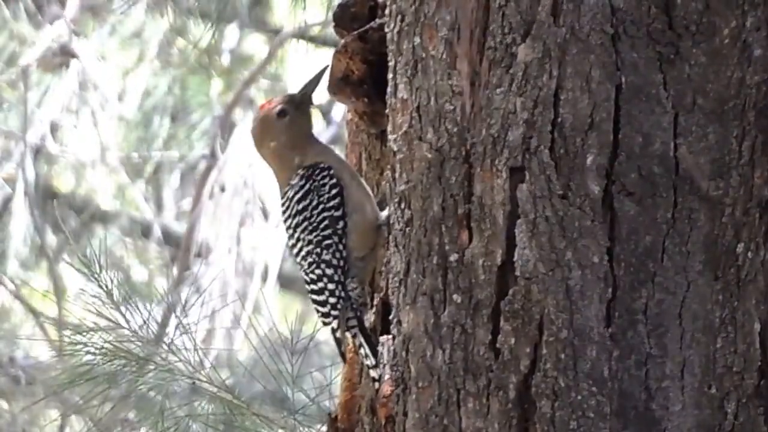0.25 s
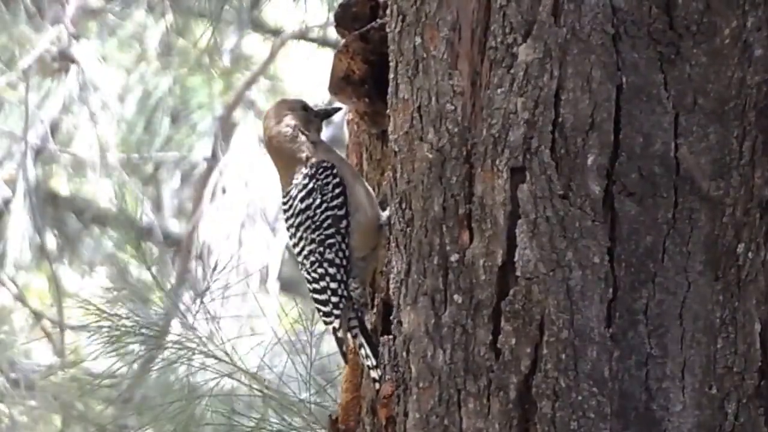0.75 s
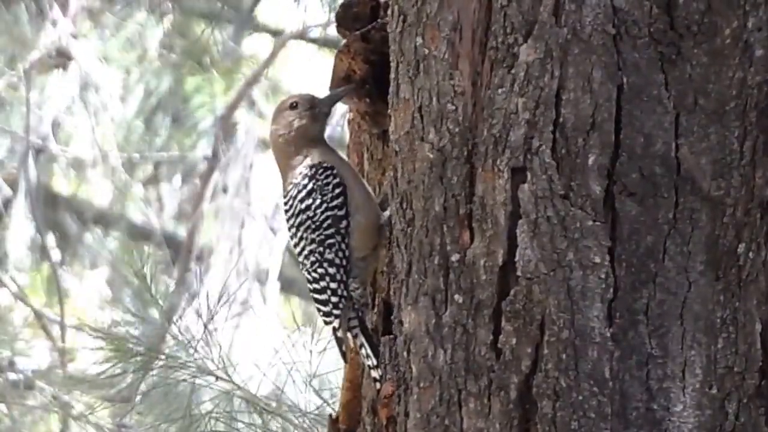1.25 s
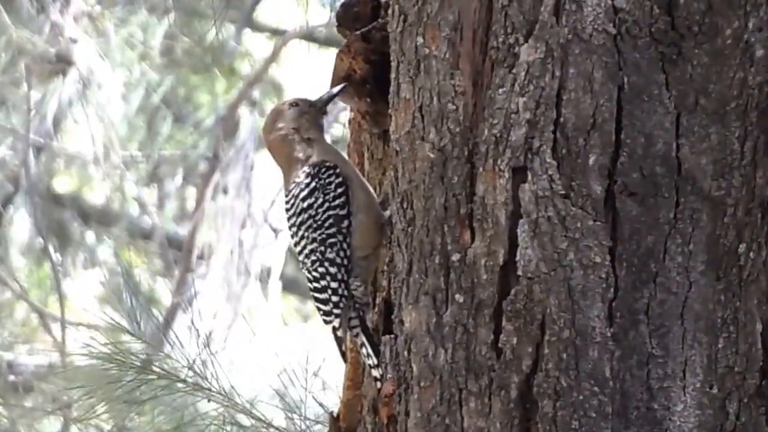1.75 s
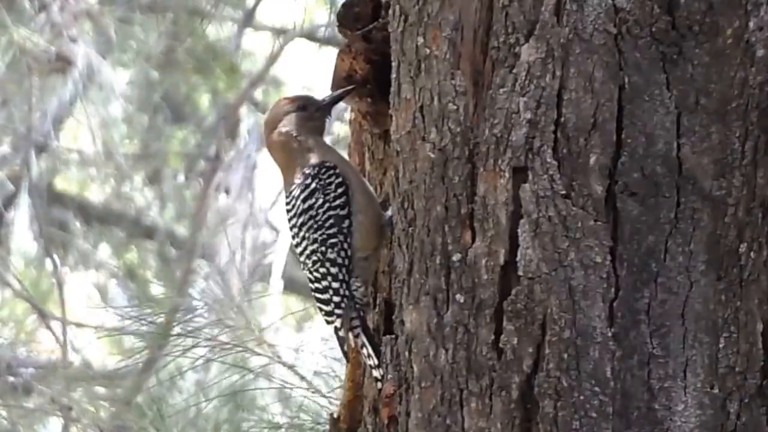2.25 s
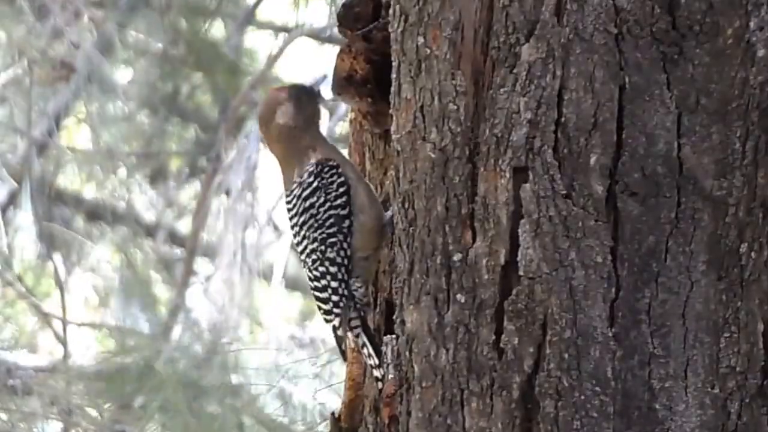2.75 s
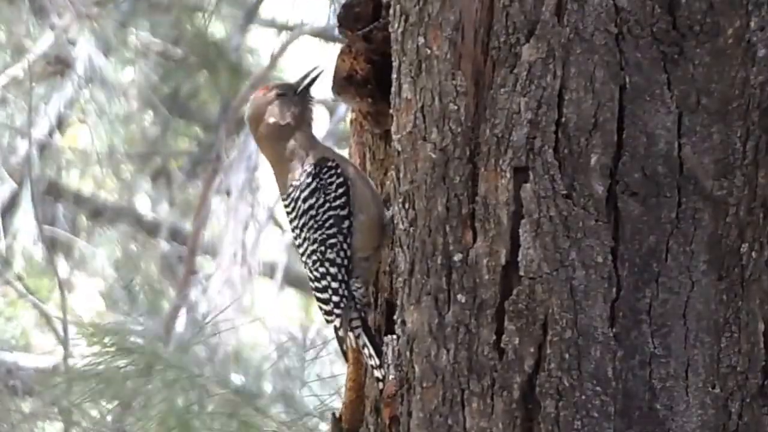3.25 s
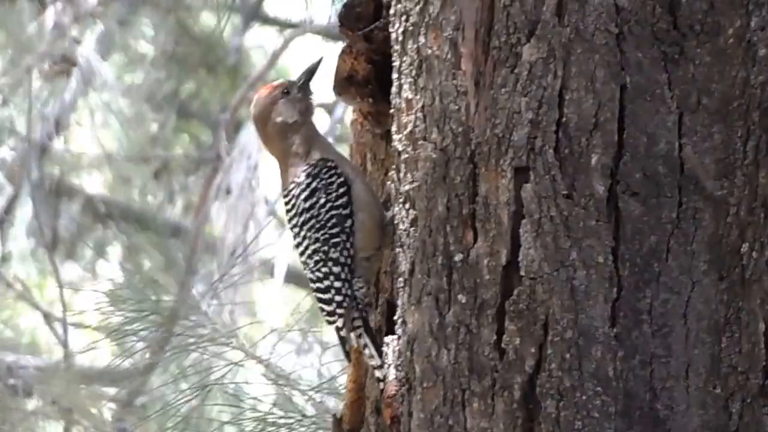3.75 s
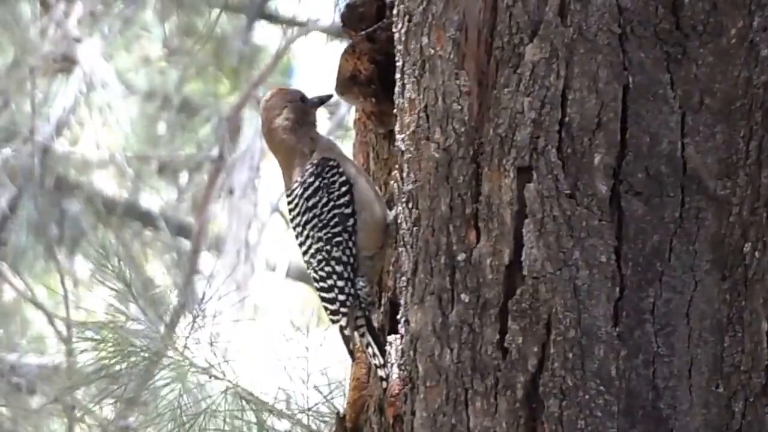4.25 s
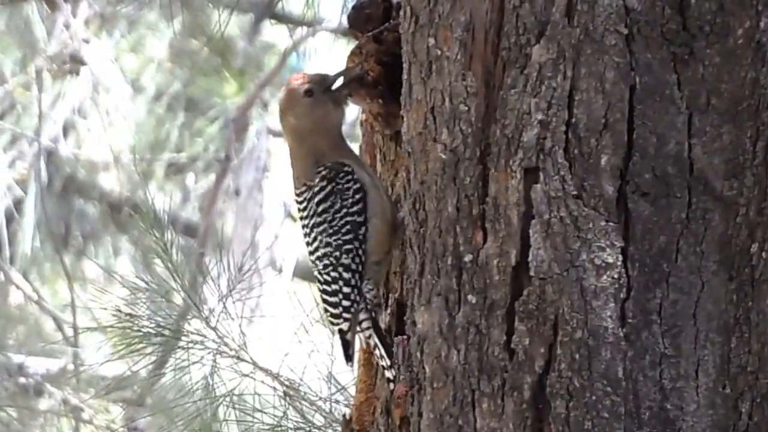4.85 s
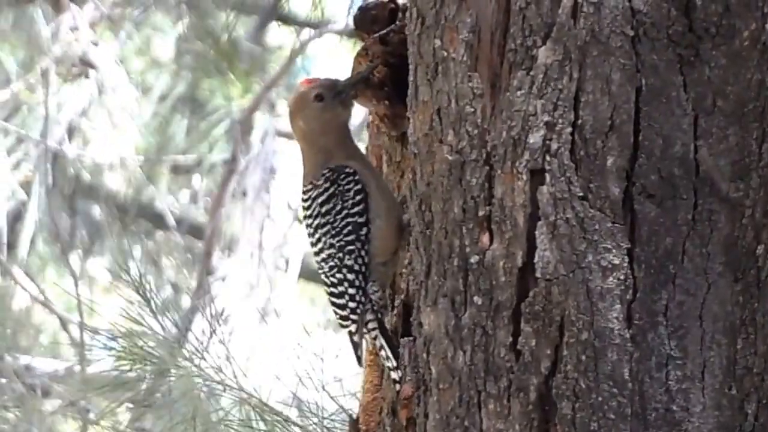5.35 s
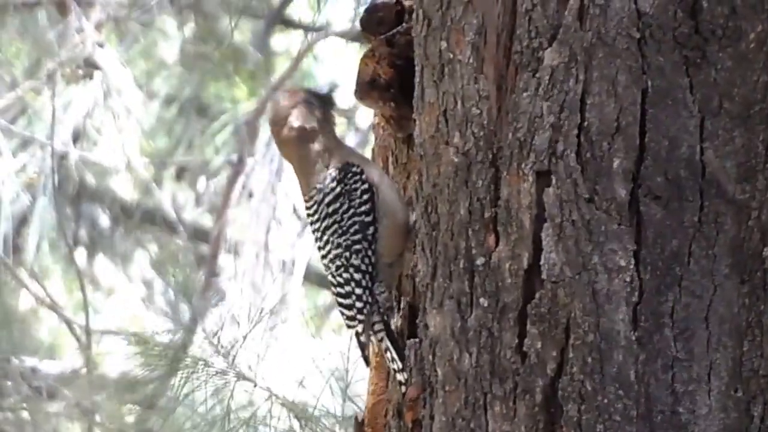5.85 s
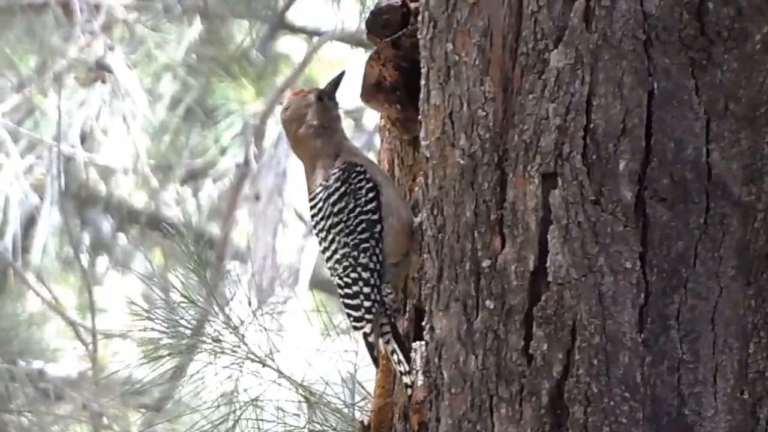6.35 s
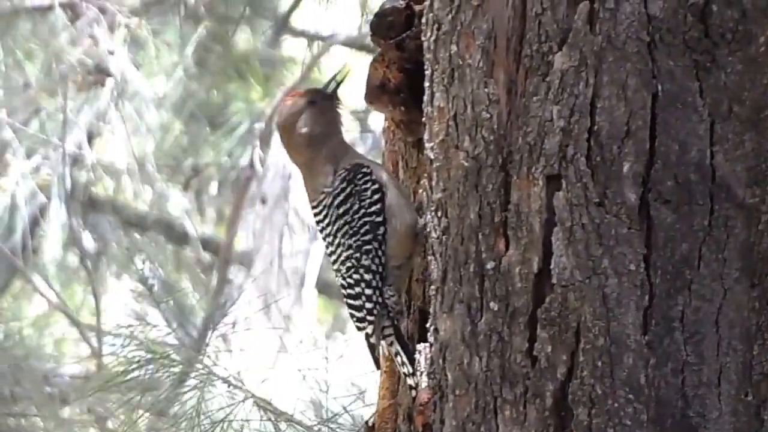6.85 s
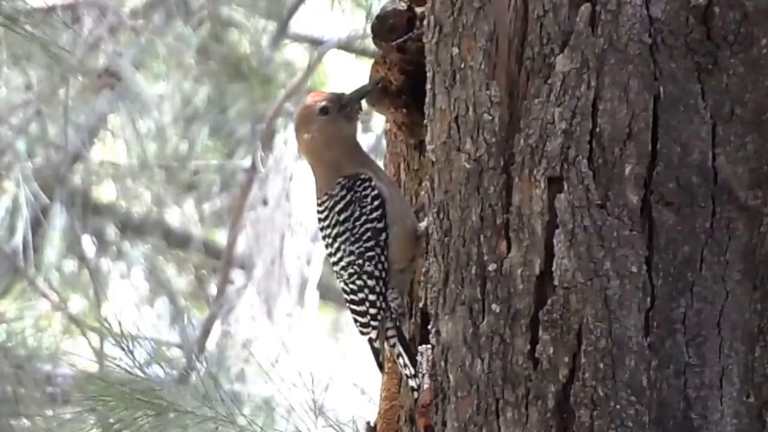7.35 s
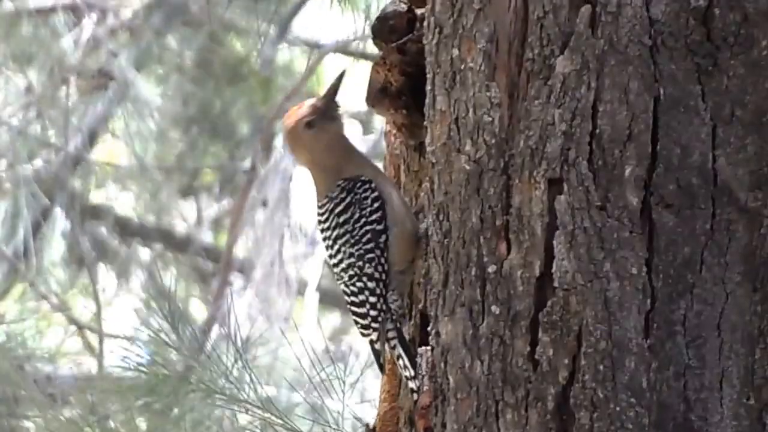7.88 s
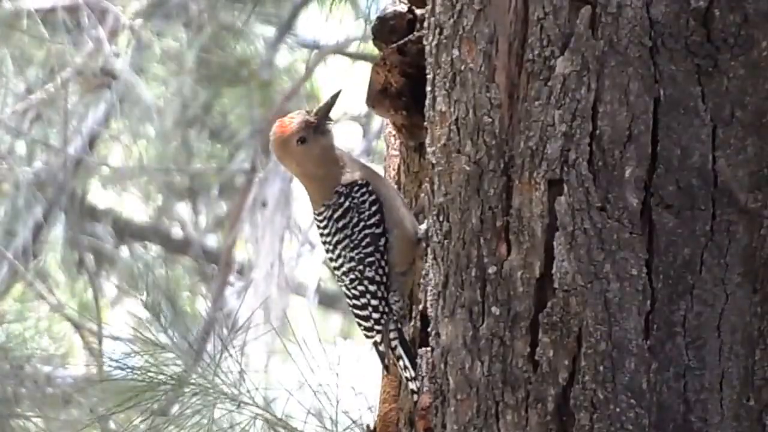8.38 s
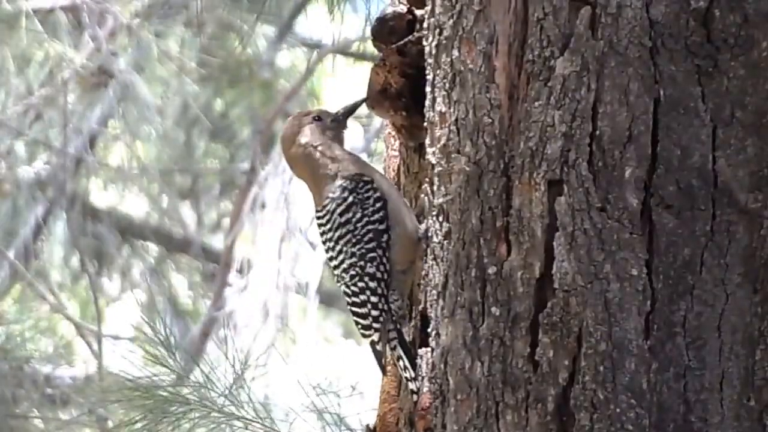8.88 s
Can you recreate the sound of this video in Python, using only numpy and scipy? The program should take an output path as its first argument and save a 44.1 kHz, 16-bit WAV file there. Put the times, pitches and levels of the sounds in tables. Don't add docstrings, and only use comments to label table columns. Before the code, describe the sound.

Light bill taps and one harder knock on a trunk, then four brief throaty woodpecker trills over distant birdsong, traffic drone and breeze.

```python
import sys
import numpy as np
from scipy import signal
from scipy.fft import rfft, irfft, next_fast_len
from scipy.io import wavfile
from scipy.ndimage import uniform_filter1d, map_coordinates

SR = 44100
rng = np.random.default_rng(int(sys.argv[2]) if len(sys.argv) > 2 else 0)


def wav_record(signal):
    frames = np.transpose(np.atleast_2d(signal))
    bounded = np.clip(frames, -1, 1)
    quanta = np.round(bounded * 32767).astype(np.int16)
    wavfile.write(sys.argv[1], SR, quanta)


def gain_from_db(level_db):
    decades = np.asarray(level_db, float) / 20
    return 10 ** decades


N = 402191


def unit(x):
    return x / np.sqrt(np.mean(x ** 2) + 1e-20)


def along(points, hz):
    f, v = np.transpose(points)
    return np.interp(np.log(hz + 1), np.log(f + 1), v)


def curves(rows):
    s, *cols = np.transpose(rows)
    return [np.interp(np.arange(N) / SR, s, c) for c in cols]


def wobble(n, rate):
    knots = rng.standard_normal(int(n * rate / SR) + 4)
    return map_coordinates(knots, [np.arange(n) * rate / SR])


def filtered(x, response):
    m = next_fast_len(len(x) + 8192)
    return irfft(rfft(x, m) * response(np.fft.rfftfreq(m, 1 / SR)), m)[:len(x)]


def add(track, s, sound):
    part = track[round(s * SR):][:len(sound)]
    part += sound[:len(part)]


def rush(spectrum, patchy_db):
    z = signal.stft(rng.standard_normal(N), nperseg=512)[2]
    field = uniform_filter1d(rng.standard_normal(z.shape), size=6, axis=0)
    field = uniform_filter1d(field, size=14, axis=1)
    noise = signal.istft(z * gain_from_db(patchy_db * unit(field)), nperseg=512)[1][:N]
    return unit(filtered(noise, lambda hz: gain_from_db(along(spectrum, hz))))


def wind():
    # time in seconds, thump level in dB.
    gusts = [(0, -39), (1.3, -42.5), (1.65, -40), (2.0, -40), (2.25, -36.5), (2.55, -40), (2.72, -48),
             (2.93, -34), (3.1, -45), (4.8, -44), (5.1, -39), (5.6, -40.5), (6.1, -41), (7.1, -43.5),
             (7.35, -37), (7.6, -41.5), (8.2, -31), (9.12, -46)]
    # frequency in Hz, density in dB per Hz.
    thump = [(8.8, -31), (15, -2.5), (38, -3.5), (70, -4), (90, -12), (120, -31.5), (200, -120)]
    # frequency in Hz, density in dB per Hz.
    flutter_spectrum = [(47, -28.5), (80, -1.5), (97, -0.5), (135, -1.5), (300, -13.5), (390, -78),
                        (660, -120)]
    # time in seconds, peak level in dB, pitch in Hz.
    slaps = [(.799, -44, 35), (1.534, -31.5, 28.6), (1.692, -29.5, 97), (2.164, -26.5, 24),
             (2.223, -29.5, 28.6), (2.301, -28.5, 46), (2.383, -25, 34), (2.456, -30, 43), (2.522, -28, 38),
             (2.869, -32, 56), (2.938, -36, 45), (2.998, -30, 30), (5.528, -30.5, 32.5), (5.582, -29, 43),
             (5.8, -31, 63), (7.346, -28, 44.6), (7.397, -19, 26), (7.756, -32.5, 21), (7.944, -21, 63),
             (7.985, -26.5, 31), (8.166, -19.5, 39), (8.227, -17.5, 85), (8.262, -22, 29), (8.328, -28, 62),
             (8.398, -28.5, 59), (8.675, -32.5, 16)]
    calm_db, flutter_db, flutter_grows = -44, -49, 0.068
    slap_cycles, slap_ruffle_db = 0.5, -22

    thump_db, = curves(gusts)
    out = gain_from_db(thump_db - 1.8 + 0.32 * wobble(N, 9)) * rush(thump, patchy_db=1.5)
    flutter = rush(flutter_spectrum, patchy_db=.5)
    ruffle = gain_from_db(flutter_db + flutter_grows * (thump_db - calm_db))
    t = np.arange(-SR // 10, SR // 10) / SR
    for (s, db, hz), sign in zip(slaps, rng.choice([-1, 1], len(slaps))):
        push = gain_from_db(db) * np.exp(-(t * hz / slap_cycles) ** 2)
        add(out, s + t[0], sign * push * np.cos(2 * np.pi * hz * t))
        add(ruffle, s + t[0], gain_from_db(slap_ruffle_db) * push)
    return out + ruffle * flutter


def traffic():
    # time in seconds, tyre whine in dB.
    passing = [(0, -1.5), (.8, -2.5), (1.5, -5), (3.2, -12), (4.2, -7), (5.3, 1), (6.5, 1), (7.3, -2),
               (8.25, -5.5), (8.42, -0.5), (8.6, -6.5), (9.12, -8)]
    # frequency in Hz, density in dB per Hz.
    drone_spectrum = [(150, -26), (250, -7), (700, -6.5), (900, -3.5), (1750, -1), (2250, -11),
                      (4300, -19.5), (7700, -120)]
    base_db, grows = -46, 0.15

    whine_db, = curves(passing)
    level_db = base_db + grows * whine_db + 2.5 + 0.12 * wobble(N, 3.5)
    drone = gain_from_db(level_db) * rush(drone_spectrum, patchy_db=-0.2)
    whine = filtered(drone, lambda hz: np.exp(-((hz - 2000) / 450) ** 2))
    return drone + (gain_from_db(whine_db) - 1) * whine


def needles():
    # time in seconds, hiss level in dB.
    breeze = [(0, -59.5), (1.4, -58.5), (3.2, -60), (4.8, -60.5), (5.6, -59), (6.4, -56.5), (7, -58.5),
              (7.7, -58), (9.12, -59)]
    # frequency in Hz, density in dB per Hz.
    hiss_spectrum = [(1470, -1.5), (2500, -5.5), (3580, -23), (4300, -9.5), (4780, -4), (7220, -8),
                     (11000, -12.5), (15500, -14.5)]

    hiss_db, = curves(breeze)
    hiss = rush(hiss_spectrum, patchy_db=.15)
    patter = gain_from_db(0.46 * wobble(N, 120))
    return gain_from_db(hiss_db + 6.5 + 0.39 * wobble(N, 3.38)) * patter * hiss


def rustle():
    # time in seconds, level in dB.
    stirring = [(0, -74.5), (2.4, -80.5), (3, -73), (3.4, -70), (5.4, -74), (6.2, -72), (7, -65),
                (7.9, -64.5), (8.6, -63), (9.12, -68)]
    # frequency in Hz, density in dB per Hz.
    flakes = [(5000, -120), (7000, -20), (10000, 0), (13500, 5), (15800, -7)]

    level_db, = curves(stirring)
    flurries_db = 2 * wobble(N, 25).clip(-2, 1.5) + 3 * wobble(N, 150).clip(-2, 2)
    return gain_from_db(level_db + flurries_db) * rush(flakes, patchy_db=2)


def ticks():
    # time in seconds, peak level in dB, centre in Hz, width in octaves.
    snaps = [(.4600, -44, 12000, 0.92), (.9114, -49.5, 12000, 0.98), (1.1505, -43, 14000, .3),
             (1.1606, -45, 12900, .3), (1.8935, -46, 14500, .3), (2.2250, -41, 3500, 0.66),
             (2.2935, -48, 6500, .5), (2.473, -39, 13500, 0.3), (2.5734, -46, 12000, .8),
             (2.8975, -43, 13000, 0.61), (2.9534, -40, 15000, .3), (2.9797, -33, 14000, 0.71),
             (3.0892, -42, 7200, 0.41), (3.0950, -43, 14500, .3), (3.1693, -46.5, 15000, .3),
             (3.3934, -45, 12000, .7), (4.0684, -50.5, 12100, .8), (4.2644, -46, 13000, .5),
             (4.5064, -43, 14000, 0.59), (5.939, -39.5, 6640, 0.68), (7.5285, -38, 8900, 0.26),
             (7.9178, -45.5, 10000, 0.73), (5.6341, -53, 9100, .4), (6.1788, -44.5, 11900, .2),
             (6.8842, -45, 15000, .3), (7.612, -44, 14200, .2), (7.83, -44.5, 13500, .3),
             (7.95, -46, 10000, .8), (8.0747, -44, 7000, .6), (8.095, -44, 14500, .2),
             (8.478, -51, 8000, 0.52), (8.58, -44.5, 13500, .3), (8.635, -42.5, 6900, .1),
             (8.7216, -46.5, 14600, .15), (9.085, -48.5, 7400, .15), (8.2274, -45.5, 13000, .6),
             (8.8334, -48, 11000, .6), (9.0024, -41, 7500, 0.74)]

    out, t = np.zeros(N), np.arange(SR // 40) / SR
    for s, db, hz, octaves in snaps:
        noise = rng.standard_normal(len(t))
        snap = unit(filtered(noise, lambda f: np.exp(-(np.log2(f / hz + 1e-9) / octaves) ** 2)))
        decay = gain_from_db(db - 6 - 60 * t / .005)
        rattle = gain_from_db(db - 8.5 - 60 * t / 0.051)
        add(out, s, snap * (decay + rattle))
    return out


def resonances(modes, f):
    return sum((-1) ** k * gain_from_db(db) * 1j * f * w / (c * c - f * f + 1j * f * w)
               for k, (c, w, db) in enumerate(modes))


def pecks():
    # time in seconds, peak level in dB, bill crack in dB, knock centre in Hz,
    # crushing t60 in seconds.
    blows = [
        (1.1470, -26.5, -51, 3440, 0.029),
        (1.5012, -26.5, -23, 3000, 0.079),
        (1.6708, -35.5, -36, 2520, 0.081),
        (1.8940, -23.5, -49, 1990, 0.051),
        (2.078, -25, -58, 2950, 0.0078),
        (2.2920, -30, -46.5, 2000, 0.033),
    ]
    # frequency in Hz, width in Hz, level in dB.
    wood = [(450, 340, 2), (780, 400, 3.5), (1570, 370, 5.5), (2700, 800, -2), (4220, 900, -2.5),
            (6500, 2500, -11.5)]
    # frequency in Hz, level in dB, t60 in seconds.
    splinter = [(2196, -3, .135), (1580, 0, .09), (740, -6, .07), (4506, -5, .045), (4274, -22, .07)]
    hard_crack_db = -40
    hard_lag_s, hard_crush_db = 0.00097, 10
    light_lag_s, light_crush_db = .0002, -3
    highs_die = .45

    out, crush, t = np.zeros(N), np.zeros(N), np.arange(SR // 8) / SR
    for s, db, crack_db, hz, t60 in blows:
        crack = gain_from_db(crack_db - 60 * t / 0.012) * rng.standard_normal(len(t))
        add(out, s, filtered(crack, lambda f: (1j * f / 6000 / (1 + 1j * f / 6000)) ** 2))

        hard = crack_db > hard_crack_db
        lag, crush_db = (hard_lag_s, hard_crush_db) if hard else (light_lag_s, light_crush_db)

        def bending(f):
            return np.exp(-np.log2(f / hz + 1e-9) ** 2 - 4j * np.pi * lag * np.sqrt(2000 * f))
        knock = filtered(1. * (t == 0), bending)
        add(out, s, gain_from_db(db) * knock / abs(knock).max())

        fibres = rng.standard_normal(len(t))
        lows = filtered(fibres, lambda f: 1 / (1 + (f / 2800) ** 6))
        fibres = lows + (fibres - lows) * gain_from_db(3 - 60 * t / t60 * (1 / highs_die - 1.5))
        decay = gain_from_db(db + crush_db - 60 * t / t60)
        add(crush, s, decay * (1 - np.exp(-t / 0.00048)) * fibres)

    s, db = max(blows, key=lambda row: row[2])[:2]
    ring = sum(gain_from_db(level - 60 * t / t60) * np.sin(2 * np.pi * hz * t) for hz, level, t60 in splinter)
    add(out, s + 0.00283, gain_from_db(db) * ring * (1 - np.exp(-t / 0.0016)))
    return out + filtered(crush, lambda f: resonances(wood, f))


def grove(x):
    # frequency in Hz, t60 in seconds.
    dying = [(1000, 0.12), (3000, 0.38), (7000, 0.39), (14000, 0.13)]

    hz, t, z = signal.stft(rng.standard_normal(SR // 2), SR, nperseg=256)
    tail = signal.istft(z * gain_from_db(-60 * t / along(dying, hz)[:, None]), SR, nperseg=256)[1]
    return signal.fftconvolve(np.pad(x, (200, 0)), tail / np.linalg.norm(tail))[:N]


def whistle(pitch, db, blur_hz):
    u = np.linspace(0, 1, len(pitch))
    phase = 2 * np.pi * np.cumsum(pitch) / SR
    clear = np.exp(-(blur_hz / 50) ** 2)
    smear = wobble(len(u), 2.5 * blur_hz) * np.sin(phase)
    smear += wobble(len(u), 2.3 * blur_hz) * np.cos(phase)
    swell = np.sin(np.pi * u ** (1 - .35 * clear)).clip(0) ** .4
    return gain_from_db(db + 5.5) * swell * (clear * np.sin(phase) + 0.56 * np.sqrt(1 - clear ** 2) * smear)


def songbirds():
    # start in seconds, length in seconds, from Hz, to Hz, rms in dB.
    flock = [(1.70, 0.27, 6000, 6540, -59), (1.748, 0.21, 4230, 5244, -54), (1.80, 0.23, 2510, 2721, -54),
             (1.83, 0.066, 3180, 3140, -52), (1.906, 0.0895, 2740, 3640, -48.5),
             (2.30, 0.39, 4137, 4180, -61), (2.438, 0.365, 3100, 3010, -60),
             (2.594, 0.034, 4200, 3190, -54), (3.298, 0.527, 4070, 4060, -59),
             (3.31, 0.64, 5980, 5900, -62), (3.327, 0.45, 2900, 2790, -58), (6.122, 0.065, 3020, 2900, -48),
             (6.147, 0.076, 2328, 2455, -48), (6.156, 0.15, 3610, 3280, -49),
             (8.63, 0.233, 7300, 6890, -64)]
    # start in seconds, length in seconds, from Hz, to Hz, rms in dB.
    chips = [
        (1.959, 0.03, 3720, 3940, -49),
        (1.989, 0.063, 3920, 4000, -58),
        (2.38, 0.035, 3180, 3350, -53),
        (3.125, 0.022, 4050, 3300, -56),
        (3.20, 0.063, 3900, 3750, -59),
        (3.246, 0.057, 3750, 2990, -55),
        (5.416, .1, 7500, 7870, -65),
        (5.648, 0.173, 3460, 3290, -64.5),
        (8.5, 0.14, 7060, 7700, -63),
    ]
    # start in seconds, length in seconds, from Hz, to Hz, rms in dB.
    pips = [
        (8.552, 0.0544, 3100, 2580, -53),
        (2.243, .017, 3800, 3250, -53),
        (2.258, .016, 3200, 3700, -56),
    ]
    bend = 1.6

    out = np.zeros(N)
    for rows, blur_share, blur_hz in (flock, .075, 0), (chips, 0, 35), (pips, 0, 14):
        for s, length, from_hz, to_hz, db in rows:
            u = np.linspace(0, 1, round(length * SR))
            left = (np.exp(-bend * u) - np.exp(-bend)) / (1 - np.exp(-bend))
            pitch = to_hz + (from_hz - to_hz) * left
            add(out, s, whistle(pitch, db, blur_share * from_hz + blur_hz))
    return out


def trill():
    # start in seconds, length in seconds, droop at the end in Hz, rms in dB.
    arches = [(2.022, .04, 600, -46.5), (2.068, .033, 200, -50), (2.108, .04, 450, -45),
              (2.15, .025, 450, -54), (2.19, .043, 350, -52), (2.228, .05, 150, -50),
              (2.295, .035, 300, -47), (2.335, .03, 150, -52), (2.388, .034, 550, -45.5),
              (2.425, .028, 450, -55), (2.46, .03, 200, -63)]
    top_hz, scoop_hz, first_scoop_hz, echo_db = 5020, 260, 500, -8

    out = np.zeros(N)
    for k, (s, length, droop_hz, db) in enumerate(arches):
        u = np.linspace(0, 1, round(length * SR))
        scoop = (scoop_hz if k else first_scoop_hz) * (1 - u) ** 3
        pitch = top_hz - scoop - droop_hz * u ** 2.67 + 40 * wobble(len(u), 143)
        swell = gain_from_db(db + 2.5 + 2.3 * wobble(len(u), 121)) * np.sqrt(np.sin(np.pi * u).clip(0))
        add(out, s, swell * np.sin(2 * np.pi * np.cumsum(pitch) / SR))
    return out + gain_from_db(echo_db) * grove(out)


def dove():
    # start in seconds, length in seconds, from Hz, rms in dB.
    coos = [
        (2.96, .175, 1010, -54.5),
        (3.44, .13, 930, -53),
        (4.94, .12, 980, -53),
        (5.36, .18, 900, -55),
        (5.8, .14, 1000, -57.5),
        (8.18, .08, 870, -54),
    ]
    fall_hz_per_s = 870

    out = np.zeros(N)
    for s, length, from_hz, db in coos:
        pitch = from_hz - fall_hz_per_s * np.arange(0, length, 1 / SR)
        add(out, s, whistle(pitch, db, blur_hz=4))
    return out


def slides():
    # start in seconds, length in seconds, from Hz, settling time in seconds, rms in dB.
    falls = [
        (6.638, .32, 4870, .088, -54),
        (8.578, .46, 5270, .195, -52),
    ]
    fall_hz, blur_hz, echo_db = 1560, 9, -7
    start_db, fading_db, tail_db = -1, 1.4, -7

    out = np.zeros(N)
    for s, length, from_hz, settling, db in falls:
        rest = np.exp(-np.arange(0, length, 1 / SR) / settling)
        fade_db = tail_db * np.linspace(-1, 1, len(rest)).clip(0) + start_db * rest ** 3
        fade_db += fading_db * wobble(len(rest), 46.5)
        add(out, s, gain_from_db(fade_db) * whistle(from_hz - fall_hz * (1 - rest), db, blur_hz))
    return out + gain_from_db(echo_db) * grove(out)


def turns_of(pop, effort_db, trough_hz, drift_hz, stretch, hook, tiring_db, swell_db, crests, ends):
    # seconds from the pop, pitch over trough, level in dB.
    opening_shape = [
        (-.007, 0.73, -12.5),
        (-.002, .72, -5),
        (0, .72, 2),
        (.003, 0.94, -5.5),
        (.008, 1.045, -3),
        (.021, 1.065, 1),
        (.031, 1.055, .5),
    ]
    # seconds from the hook, pitch over trough, level in dB.
    closing_shape = [
        (-.007, 1.13, -1.5),
        (-.004, .92, -15),
        (0, .87, -2.5),
        (.003, .81, -4),
        (.007, 0.74, -13),
    ]
    first_trough_s, rise_s, fall_s = .044, .0242, .0182
    trough_db, trough_sinks_db = 2.5, -1.5

    pop_db, last_s, last_hz, hook_db, droop = ends
    opening = [(s, ratio * trough_hz, db + pop_db * (s <= 0)) for s, ratio, db in opening_shape]
    roll = []
    for k, (crest_hz, crest_db) in enumerate(zip(*crests)):
        s = stretch * (first_trough_s + k * (rise_s + fall_s))
        roll.append((s, trough_hz + k * drift_hz, trough_db + k * trough_sinks_db))
        roll.append((s + rise_s, crest_hz, crest_db))
    roll.append((hook + last_s, last_hz, -1.5))
    closing = []
    middle = closing_shape[2][1]
    for k, (s, ratio, db) in enumerate(closing_shape):
        drooped = middle + droop * (ratio - middle) if k else ratio
        closing.append((hook + s, trough_hz * drooped, db + hook_db * (k > 1)))
    s, hz, db = np.transpose(sorted(opening + roll + closing))
    db += swell_db * np.isin(s, [row[0] for row in opening_shape[-2:]])
    db += tiring_db * np.clip(3 * s / hook - 1.9, 0, 1)
    return pop + s, hz, effort_db + db


def syrinx(s, hz, effort_db, trough_hz, closing_db):
    pointed = .75
    break_db = 3.5
    trough_sag_db, glide_loss_db = -3, -5

    t = np.arange(s[0], s[-1], 1 / SR)
    place = np.interp(t, s, np.arange(len(s)))
    step = np.sin(np.pi / 2 * (place % 1)) ** 2
    rising = np.diff(hz, append=0)[place.astype(int)] > 0
    eased = np.floor(place) + np.where(rising, step ** pointed, 1 - (1 - step) ** pointed)
    pitch = np.interp(eased, np.arange(len(s)), hz) + 7 * wobble(len(t), 494.5)
    slack = np.clip((1380 - pitch) / 300, 0, 1)
    phase = 2 * np.pi * np.cumsum(pitch + 75 * slack * wobble(len(t), 400)) / SR
    gliding = np.clip(abs(uniform_filter1d(np.gradient(pitch), size=88)) * SR / 25000, 0, 1)
    dull_db = closing_db * (t - s[0]) / (s[-1] - s[0])
    sag_db = trough_sag_db * np.clip((1.04 - pitch / trough_hz) / .04, 0, 1) * (1 - slack)

    source = np.zeros(len(t))
    for k in range(1, 15):
        flicker = 0.13 * k + (6 if k > 2 else break_db) * gliding
        level_db = flicker * wobble(len(t), 141.7).clip(-3, 1.2)
        start = 0
        if k == 1:
            level_db += sag_db
        if k > 2:
            level_db += (k - 2) * dull_db - 11 * slack + glide_loss_db * gliding
            start = rng.uniform(0, 2 * np.pi)
        source -= gain_from_db(level_db) * np.cos(k * phase + start) * (k * pitch < SR / 2.2)
    breath = filtered(rng.standard_normal(len(t)), lambda f: (f / 4000) ** 4 / (1 + (f / 4000) ** 4))
    rasp = 1.1 * slack * rng.standard_normal(len(t))
    return gain_from_db(np.interp(t, s, effort_db)) * (source + rasp + gain_from_db(-3) * breath)


def throat_to_microphone(source, aim, stretch, bark_db, beam):
    # frequency in Hz, width in Hz, level in dB.
    throat = [(1973, 420, 9.5), (3100, 140, -7), (4360, 280, -35), (5500, 250, -32), (7200, 1200, -3.5),
              (8700, 130, -42), (11800, 660, -1.5), (14900, 620, -3.5)]
    # frequency in Hz, width in Hz, level in dB.
    clefts = [(4000, 390, -13), (4890, 260, -12.5), (8800, 890, -6.5), (13650, 560, -8), (10000, 410, -0.5),
              (6250, 240, -5.5)]
    beam_hz = (5500, 7200, 11800, 14800)
    beam_width_hz = 1100
    delays = rng.uniform(0.000825, .028, size=60)

    def path(f):
        shape_db = sum(db * np.exp(-((f / stretch - c) / w) ** 2) for c, w, db in clefts)
        shape_db += sum(db * np.exp(-((f - c) / beam_width_hz) ** 2) for c, db in zip(beam_hz, beam))
        shape_db += aim * np.log2(np.maximum(f / 3000, 1))
        peaks = np.sqrt(sum(abs(resonances([mode], f / stretch)) ** 2 for mode in throat))
        lows = (f / 1500) ** 3 / (1 + (f / 1500) ** 3)
        echoes = sum(gain_from_db(bark_db - 4 - 310 * d) * np.exp(-2j * np.pi * f * d) for d in delays)
        close = 1 + f ** 2 / (f ** 2 + 4500 ** 2) * echoes
        return peaks * lows * close * gain_from_db(shape_db)
    return filtered(np.pad(source, (0, SR // 30)), path)


def calls():
    # opening pop in seconds, effort in dB, trough pitch in Hz, trough drift in Hz per roll.
    bird = [
        (3.6499, -27.5, 1468, -16),
        (5.070, -28, 1516, 18.5),
        (6.2957, -28.5, 1470, -45.5),
        (7.219, -25.5, 1454, -3),
    ]
    # stretch of the roll (ratio), closing hook in seconds after the pop.
    paces = [(1, .166), (1, .183), (.99, .18), (1.002, .184)]
    # change of effort over the last third in dB, swell of the held note in dB.
    manners = [(-1, -2.5), (1.5, 3), (0.5, 1), (-1, -0.5)]
    crest_hz = [(1805, 1880, 1800), (1840, 1895, 1870), (1785, 1872, 1825), (1810, 1880, 1845)]
    crest_db = [(-2.5, 2, -5), (2.2, 4.6, 2.2), (-2, 1.6, -4), (-2, 2.2, -1.6)]
    # pop in dB, last trough in seconds from the hook, its pitch in Hz, hook in dB,
    # share of the hook's droop.
    call_ends = [(-1, -.009, 1720, -5, .9), (-2, -.016, 1600, -2, .7), (3, -.015, 1620, -2, .3),
                 (-3, -.015, 1490, -4, -.4)]
    beams = [(0.7, 0, 3, -3), (-0.5, 1.2, 2, 4.5), (2.34, 1, 0.5, 1), (-2, 2.5, -3, 0)]
    # aim at the microphone in dB per octave above 3 kHz, stretch of the throat resonances
    # (ratio), closing in dB per overtone, scatter off bark in dB.
    bills = [(-3.5, 1, -1.4, -12.5), (-3.5, 1, -0.7, -13.5), (-5.5, 0.98, -1, -11), (-4, 0.99, 0.2, -14)]

    out = np.zeros(N)
    every_call = zip(bird, paces, manners, zip(crest_hz, crest_db), call_ends, beams, bills)
    for call, pace, manner, crests, ends, beam, (aim, stretch, closing_db, bark_db) in every_call:
        s, hz, effort_db = turns_of(*call, *pace, *manner, crests, ends)
        source = syrinx(s, hz, effort_db, call[2], closing_db)
        add(out, s[0], throat_to_microphone(source, aim, stretch, bark_db, beam))
    return out


def scene():
    ground = wind() + traffic() + needles() + rustle()
    knocks = ticks() + pecks()
    far = songbirds() + trill() + dove() + slides()
    voice = calls()
    echo = grove(gain_from_db(-11.5) * voice + gain_from_db(-14) * knocks + gain_from_db(-10) * far)
    return (voice + knocks + far + echo + ground)[None]


def low_pass(x):
    return signal.sosfilt(signal.butter(12, 16610, fs=SR, output="sos"), x)


def record(dry):
    fade_in_db, fade_in_s, top_hz = -6, 0.3, 15790
    settling = gain_from_db(fade_in_db * np.exp(-np.arange(N) / SR / fade_in_s))
    limited = filtered(settling * dry[0], lambda hz: np.where(hz < top_hz, 1, gain_from_db(-45)))
    return low_pass(limited[None])


dry = scene()
out = record(dry)
wav_record(out)
```